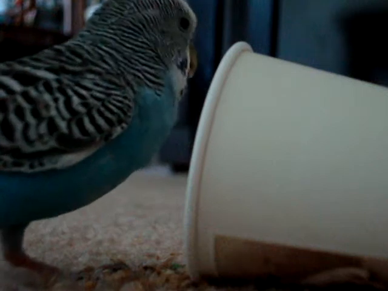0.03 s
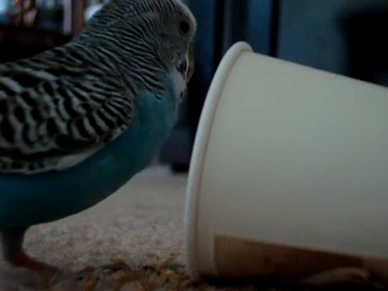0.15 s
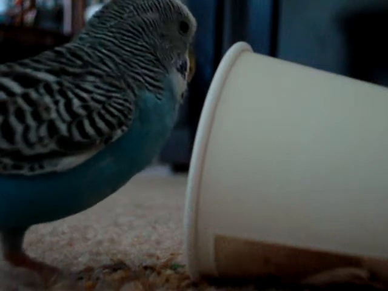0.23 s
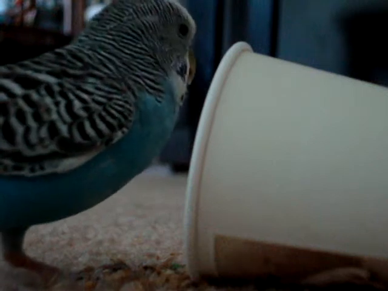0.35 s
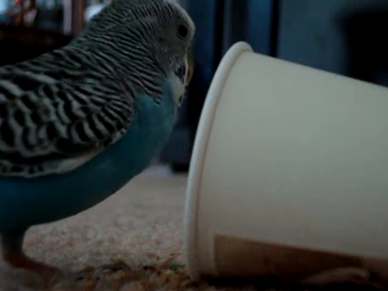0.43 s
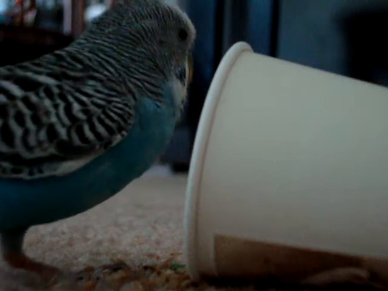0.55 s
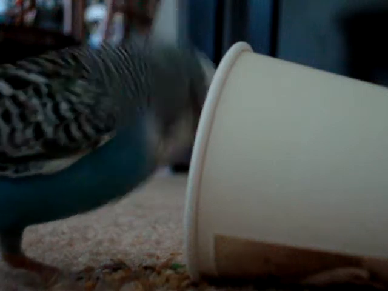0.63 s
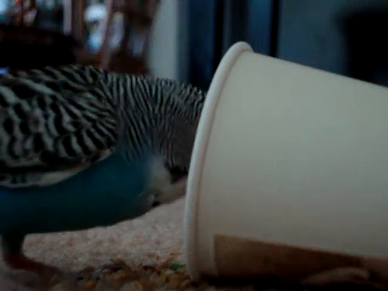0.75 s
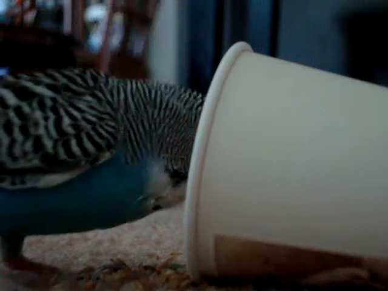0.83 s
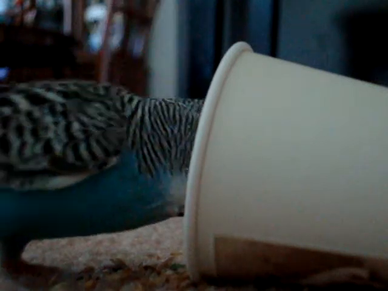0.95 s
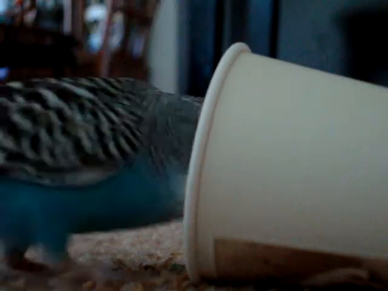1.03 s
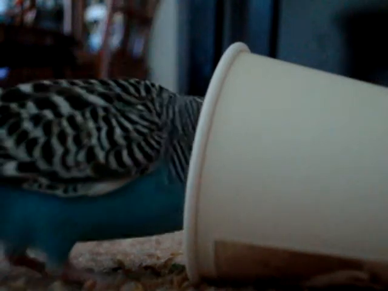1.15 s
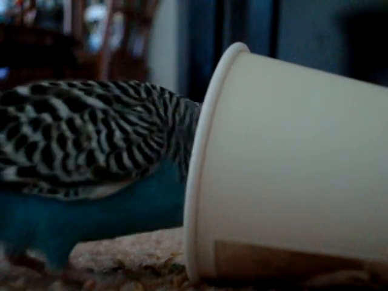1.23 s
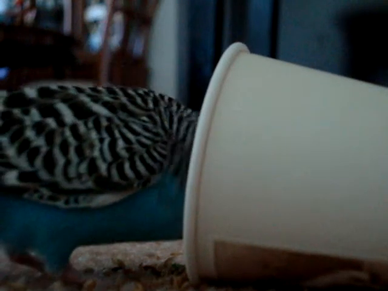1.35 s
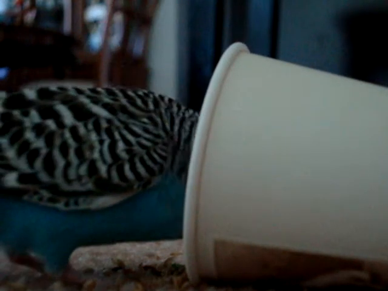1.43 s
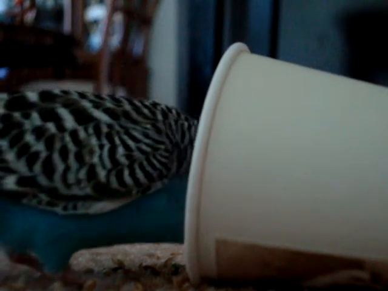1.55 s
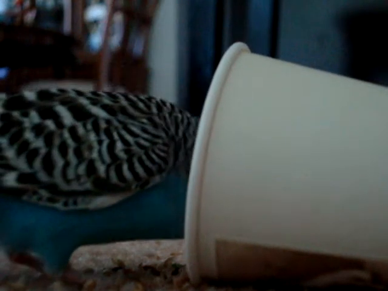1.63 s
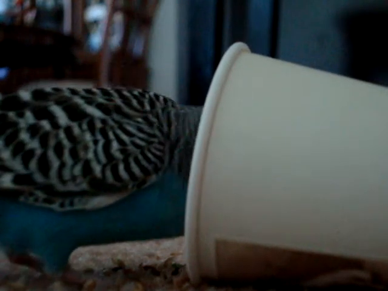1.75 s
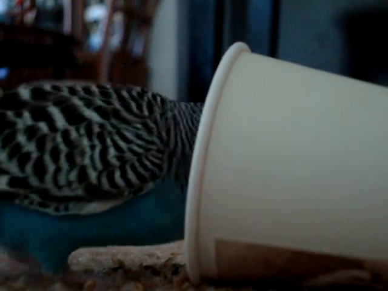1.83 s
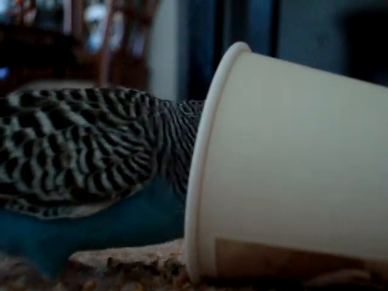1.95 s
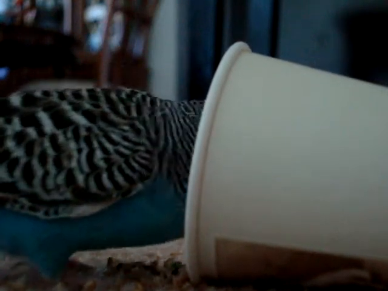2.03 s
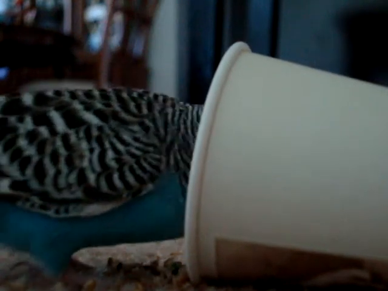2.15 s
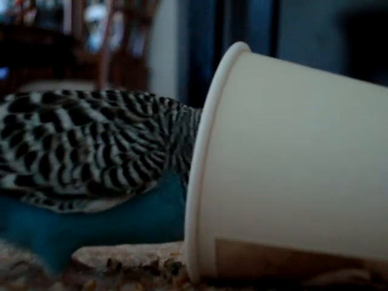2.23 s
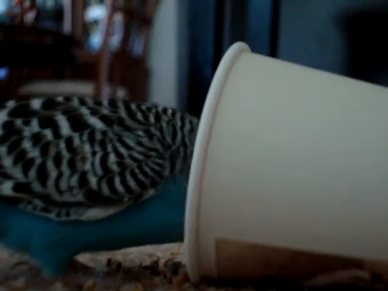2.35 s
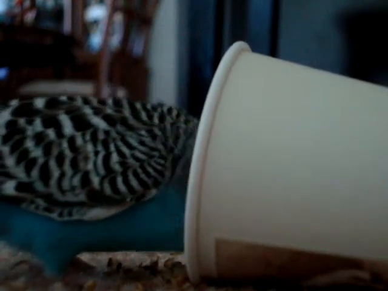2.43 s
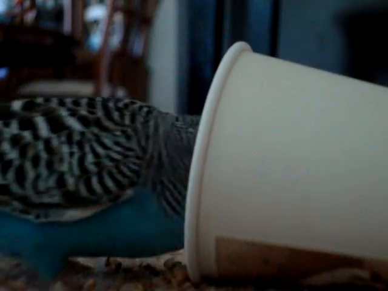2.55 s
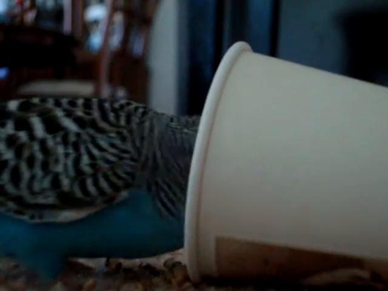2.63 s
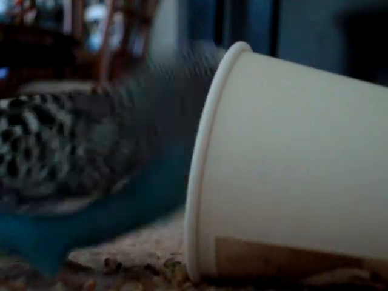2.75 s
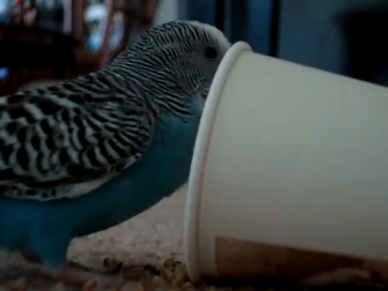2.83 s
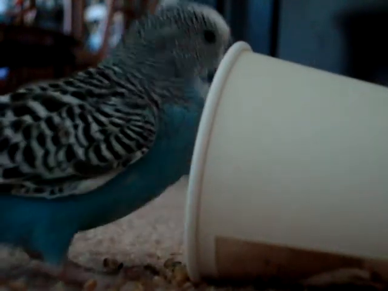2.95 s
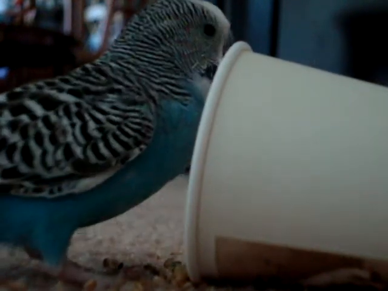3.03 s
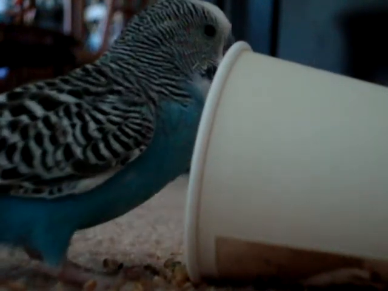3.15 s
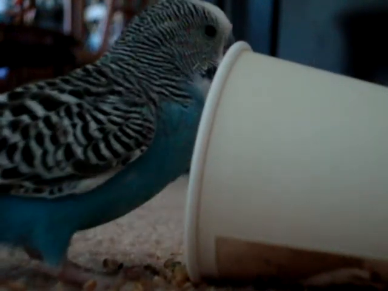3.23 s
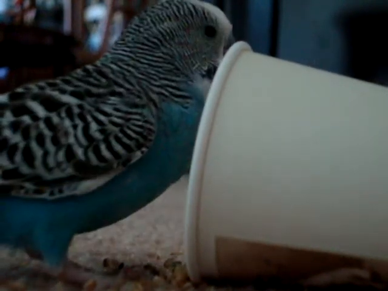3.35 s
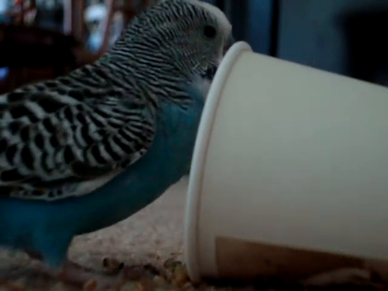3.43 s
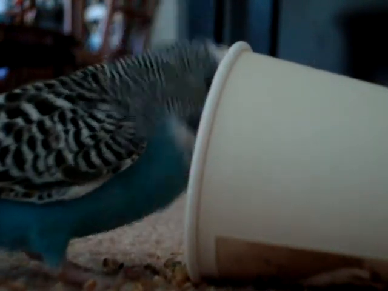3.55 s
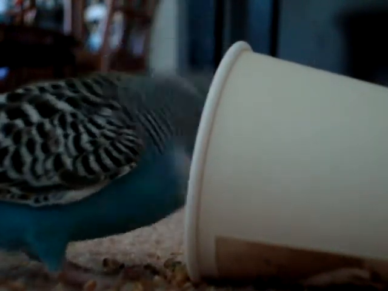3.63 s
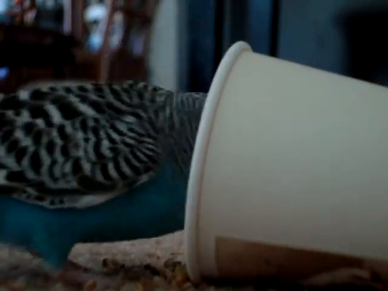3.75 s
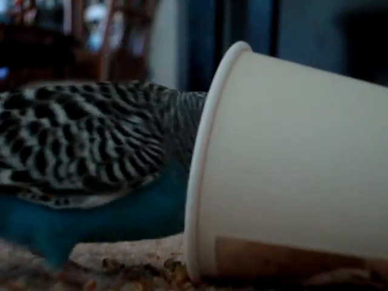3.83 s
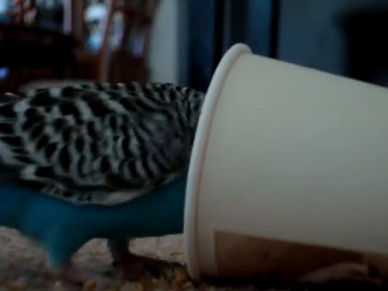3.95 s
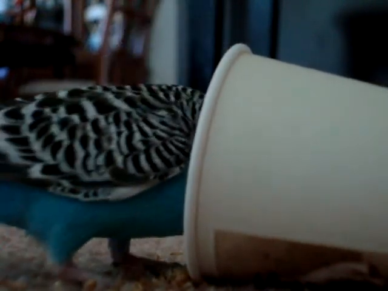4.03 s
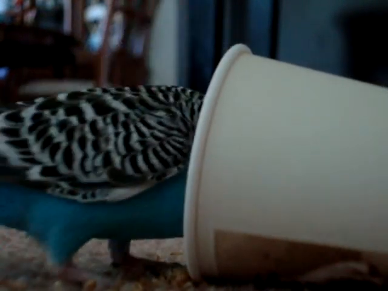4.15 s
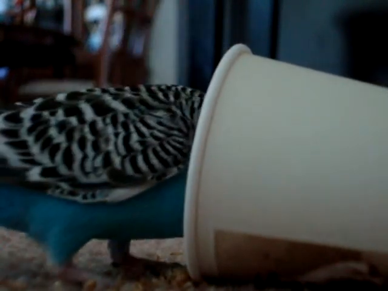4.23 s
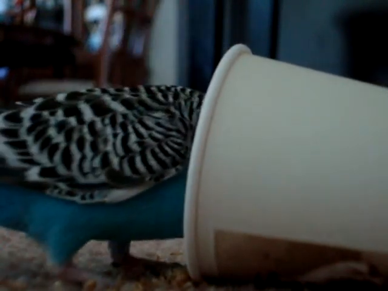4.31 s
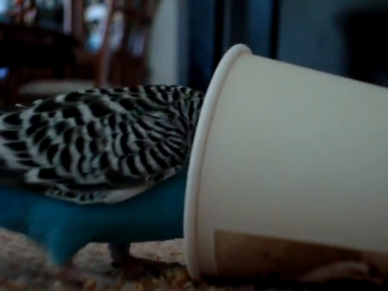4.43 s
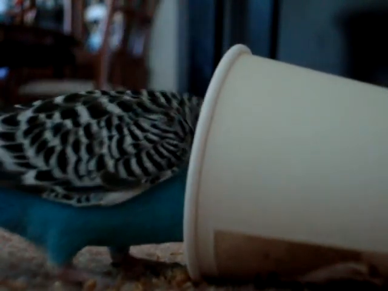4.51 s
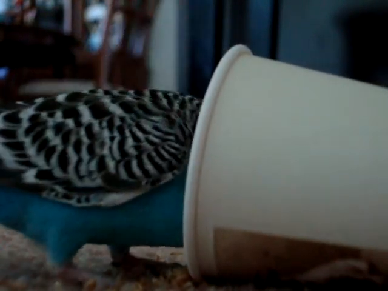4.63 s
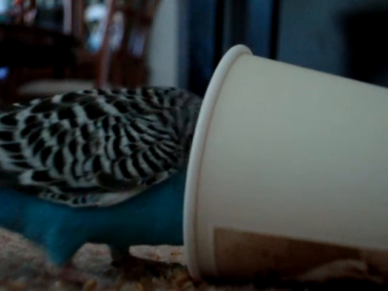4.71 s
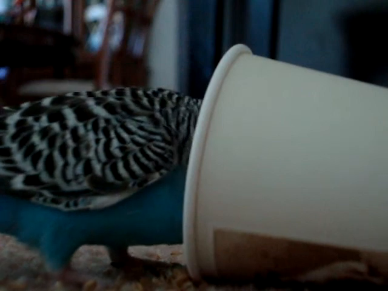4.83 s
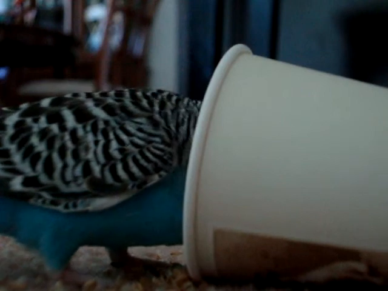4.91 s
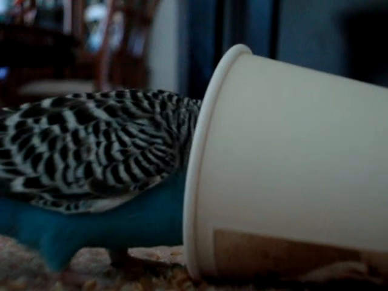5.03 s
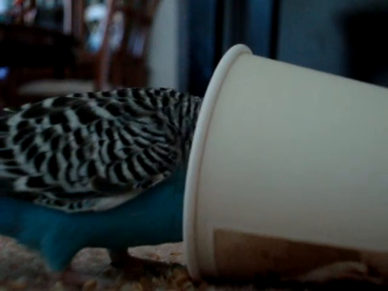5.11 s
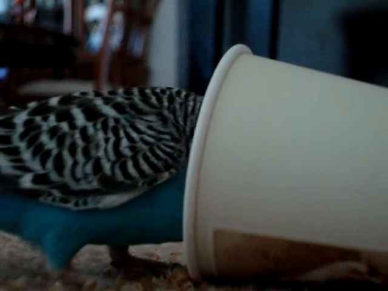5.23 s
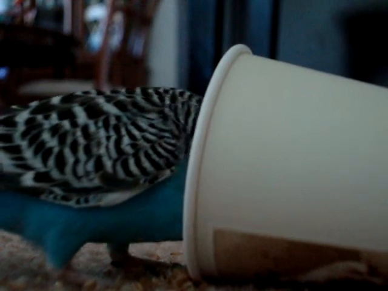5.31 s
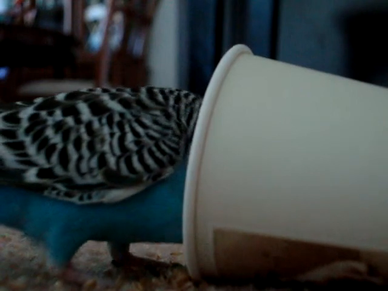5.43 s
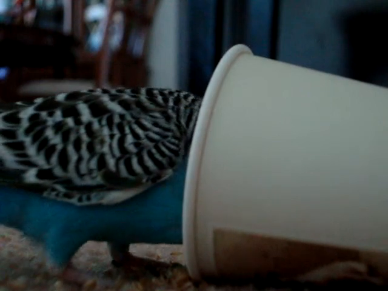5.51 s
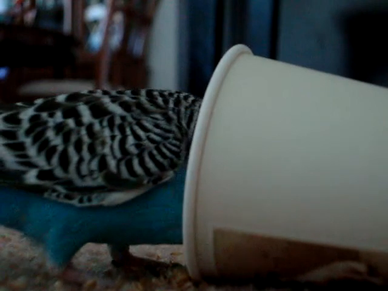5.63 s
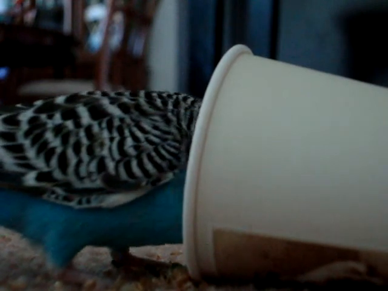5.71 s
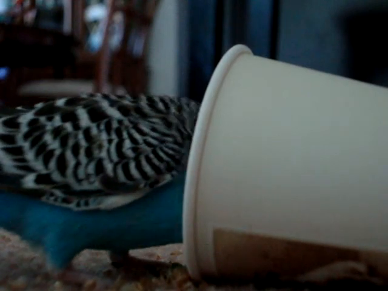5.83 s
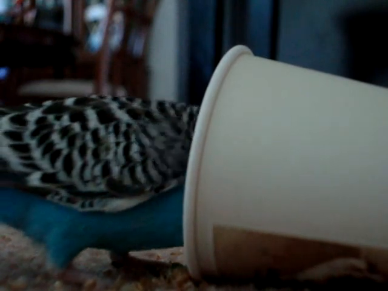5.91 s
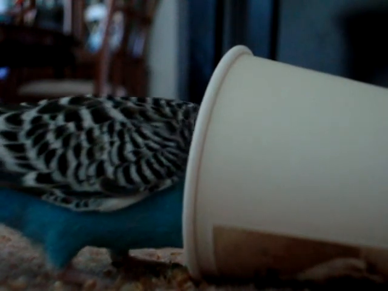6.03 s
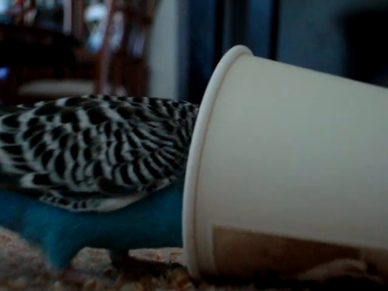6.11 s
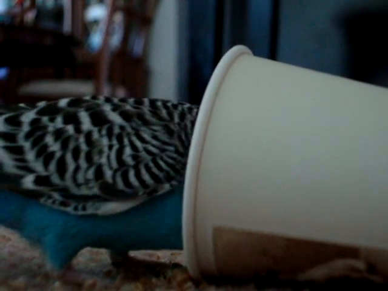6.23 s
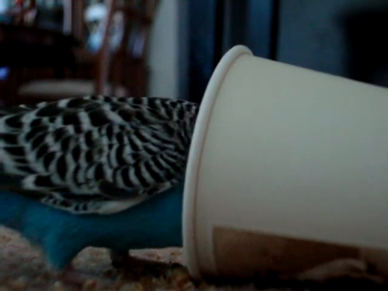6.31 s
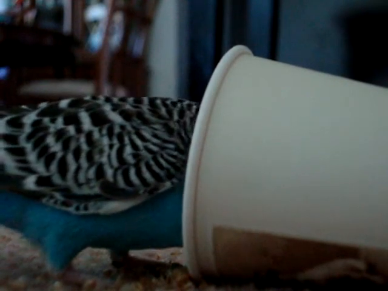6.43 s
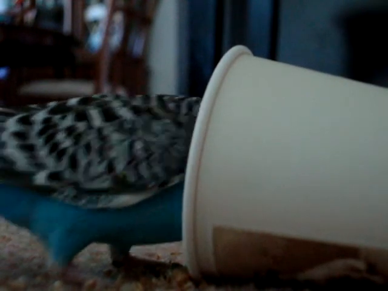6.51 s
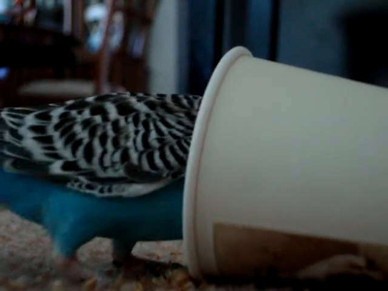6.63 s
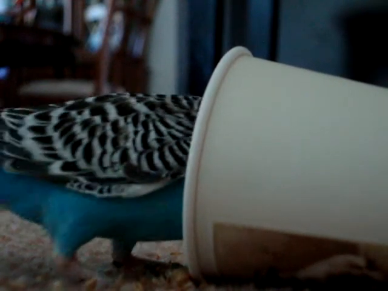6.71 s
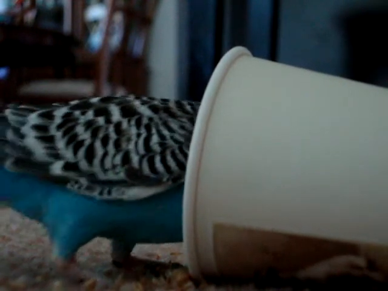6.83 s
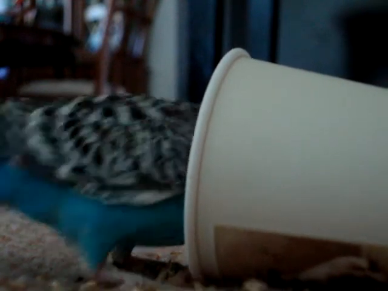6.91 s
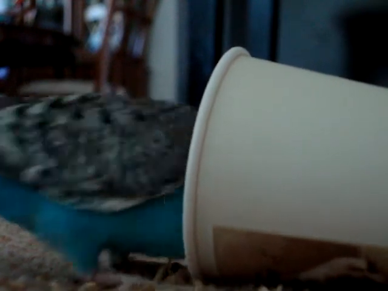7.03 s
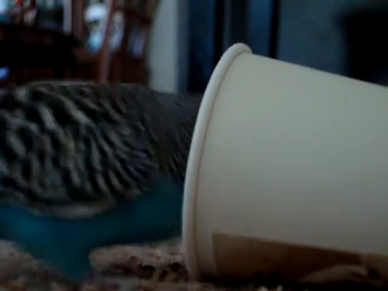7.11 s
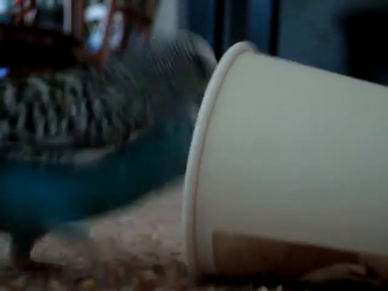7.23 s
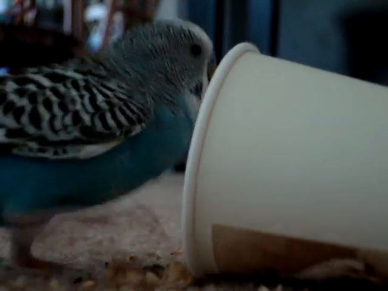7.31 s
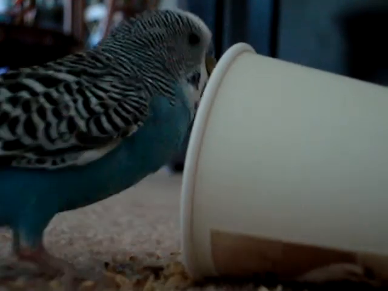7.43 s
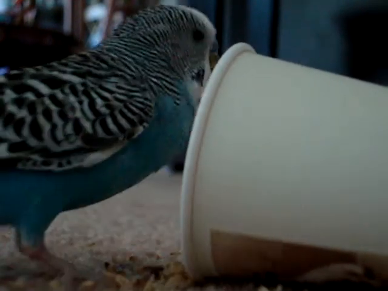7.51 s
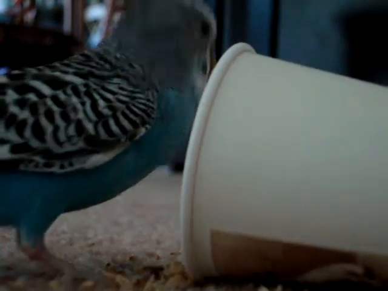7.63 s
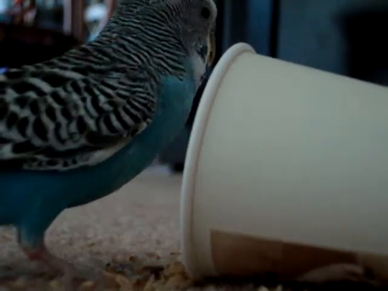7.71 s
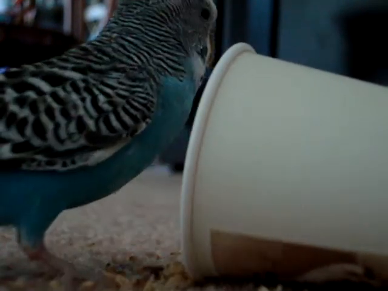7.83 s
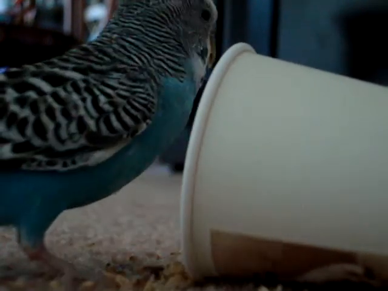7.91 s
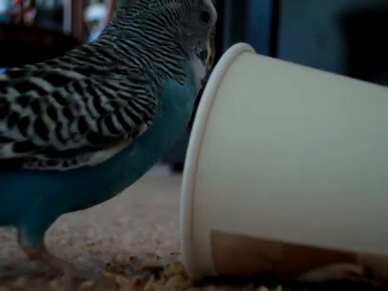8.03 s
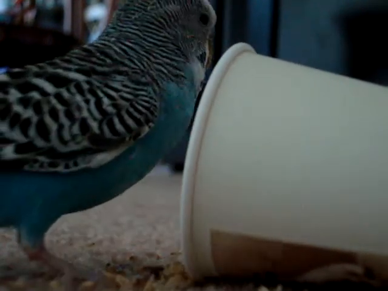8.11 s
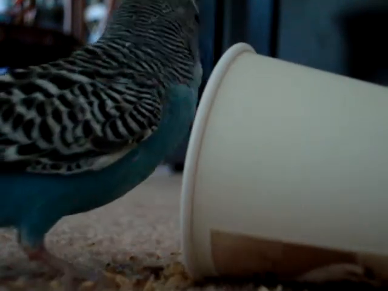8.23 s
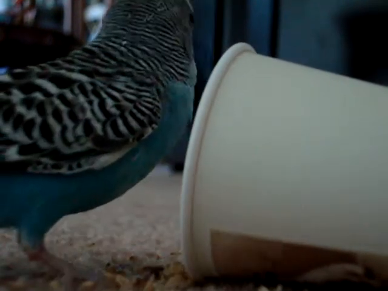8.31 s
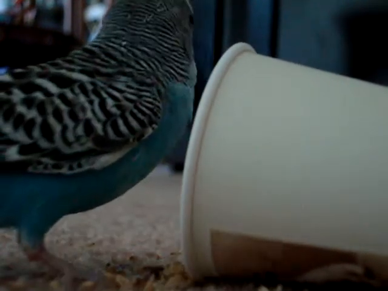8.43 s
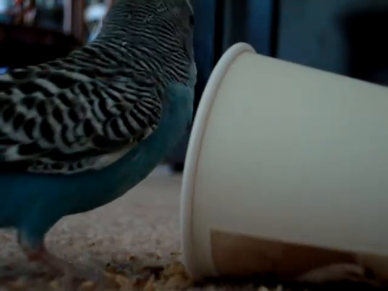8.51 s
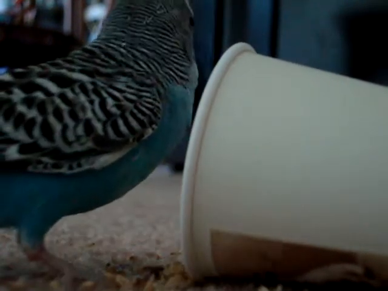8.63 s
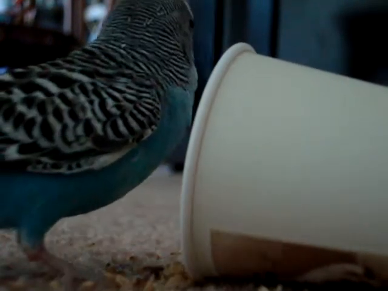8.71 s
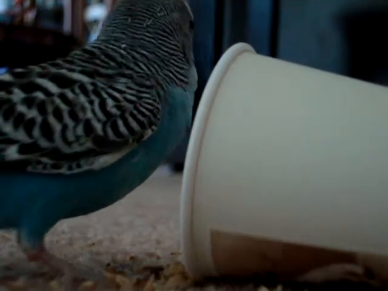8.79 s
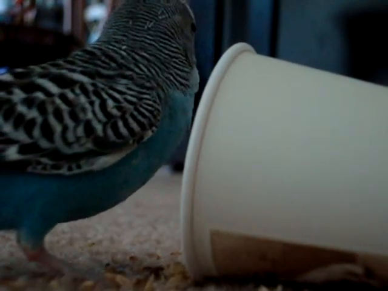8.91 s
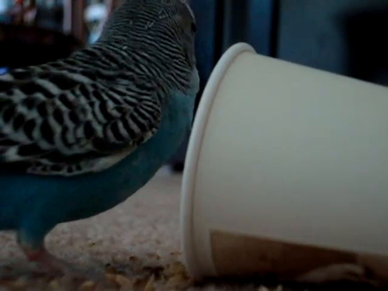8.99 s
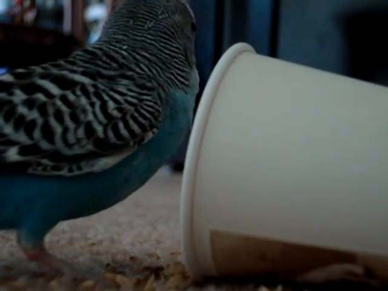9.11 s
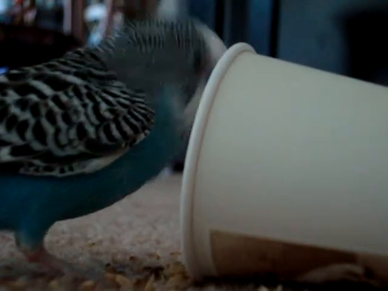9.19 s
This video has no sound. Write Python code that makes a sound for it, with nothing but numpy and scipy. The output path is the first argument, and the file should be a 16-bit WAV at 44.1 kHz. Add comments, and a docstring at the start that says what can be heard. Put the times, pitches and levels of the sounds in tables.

```python
"""Sharp snaps, crunches and papery knocks: a budgie on a carpet cracks seeds and rummages, head first,
in a paper cup lying on its side. Breaking husks and sliding seeds ring the same short, bright modes;
the beak knocks the cup and the floor jolts a microphone lying close by.
Underneath: steady microphone hiss, a wavering hum, two thin high tones and a few faint ticks."""
import sys
import numpy as np
from scipy import signal
from scipy.fft import rfft, irfft
from scipy.io import wavfile

SR = 44100
rng = np.random.default_rng(int(sys.argv[2]) if len(sys.argv) > 2 else 0)


def output_pcm(signal):
    """Save a mono or channel-first signal as 16-bit PCM at the path in sys.argv[1].

    Samples are clipped to [-1, 1] before scaling.
    """
    pcm = np.clip(np.atleast_2d(signal).T, -1, 1) * 32767
    wavfile.write(sys.argv[1], SR, np.round(pcm).astype(np.int16))


N = 408366

# Modes of husk, beak and paper wall. Each row: frequency in Hz, level in dB.
HUSK_MODES = [(2400, -4), (3100, 0), (3800, 0), (4400, -1), (4900, -1), (5300, 0), (5800, 0), (6400, 0),
              (7100, 0), (7900, 0), (8700, -1), (9600, 0)]


def from_db(db):
    """Decibels to gain."""
    return 10 ** (np.asarray(db) / 20)


def unit_rms(x):
    """Scale to unit rms."""
    return x / np.sqrt(np.mean(x ** 2) + 1e-20)


def add(out, start_s, sound):
    """Mix a short sound in at start_s."""
    at = round(start_s * SR)
    out[at:at + len(sound)] += sound[:N - at]


def drift(corner_hz):
    """Slow wander: noise low-passed twice, unit rms."""
    hop, warmup = 40, 2000
    pole = np.exp(-2 * np.pi * corner_hz * hop / SR)
    noise = rng.standard_normal(N // hop + warmup + 2)
    slow = signal.lfilter([1], [1, -2 * pole, pole * pole], noise)[warmup:]
    return np.interp(np.arange(N) / hop, np.arange(len(slow)), unit_rms(slow - slow.mean()))


def ring(force, hz, t60_ms):
    """One mode, heard as surface velocity: a unit click starts it at full height."""
    radius = from_db(-60e3 / (t60_ms * SR))
    angle = 2 * np.pi * hz / SR
    return signal.lfilter([.5, 0, -.5], [1, -2 * radius * np.cos(angle), radius * radius], force)


def husk_ring(force, peaks, t60_ms, scatter, slope_db_oct):
    """Husk modes, strongest near the (Hz, dB) peaks; scatter varies each mode's level and tuning."""
    hz, level_db = np.transpose(HUSK_MODES)
    tilt_db = np.max([db - slope_db_oct * np.abs(np.log2(hz / f)) for f, db in peaks], axis=0)
    gains = from_db(level_db + tilt_db + 1.5 * scatter[0])
    tuned_hz = hz * (1 + .015 * scatter[1])
    modes = sum(gain * ring(force, f, t60_ms) for gain, f in zip(gains, tuned_hz))
    # The piece also rings at the peaks themselves, more so for a steep slope.
    modes += sum(from_db(db) * slope_db_oct / 30 * ring(force, f, t60_ms) for f, db in peaks)
    peaks_hz = [f for f, _ in peaks]
    reach = 2 ** (10 / max(slope_db_oct, 3))  # frequency ratio for a 10 dB fall
    low_hz = max(min(peaks_hz) / reach, 1540)  # bodies this small radiate little bass
    high_hz = min(max(peaks_hz) * reach, .45 * SR)
    return signal.sosfilt(signal.butter(2, (low_hz, high_hz), "band", fs=SR, output="sos"), modes)


def hiss(rms_db=-53):
    """Steady noise of the microphone and its amplifier."""
    # Each row: frequency in Hz, relative density in dB.
    spectrum = [(25, -31.5), (60, -26.5), (95, -18), (140, -16), (250, -10.5), (480, -10.5), (850, -12.5),
                (2000, -17.5), (4700, -22.5), (9300, -26.5)]
    corner_hz, corner_db = np.transpose(spectrum)
    hz = np.maximum(np.arange(N // 2 + 1) * SR / N, 1)
    shape_db = np.interp(np.log(hz), np.log(corner_hz), corner_db)
    noise = irfft(rfft(rng.standard_normal(N)) * from_db(shape_db), N)
    return from_db(rms_db) * unit_rms(noise)


def hum_and_whine(hum_hz=239.4, hum_rms_db=-62.5, waver_hz=1.12, waver_db=.6):
    """A low hum wavering in pitch and level, plus two steady high tones."""
    # Each row: frequency in Hz, rms level in dB.
    whine_tones = [(7552, -80), (7582, -84)]
    t_s = np.arange(N) / SR
    cycles = np.cumsum(hum_hz + waver_hz * drift(3.3)) / SR
    hum = from_db(hum_rms_db + waver_db * drift(4.0)) * np.sin(2 * np.pi * cycles)
    whine = sum(from_db(db) * np.sin(2 * np.pi * hz * t_s) for hz, db in whine_tones)
    return np.sqrt(2) * (hum + whine)


def faint_ticks():
    """Clicks into one small mode, barely above the hiss."""
    # Each row: start in seconds, peak in dB.
    ticks = [(7.6835, -46), (9.0515, -50), (9.068, -49), (9.135, -48), (9.1515, -48)]
    force = np.full(N, 1e-18)
    for start_s, peak_db in ticks:
        force[round(start_s * SR)] = from_db(peak_db)
    return ring(force, hz=4800, t60_ms=12)


def floor_jolts():
    """Jolts through the floor push the microphone's membrane: it dips, jumps out and settles."""
    # Each row: start in seconds, level in dB, settling time constant in ms.
    jolts = [(3.0831, -28.5, 0.79), (6.9172, -32, 1.2), (6.9309, -25, 0.57)]
    out = np.zeros(N)
    t_ms = np.arange(1024) * 1000 / SR
    for start_s, level_db, settle_ms in jolts:
        pulse = np.exp(-t_ms / settle_ms) - 3.15 * np.exp(-t_ms / .055)
        add(out, start_s, from_db(level_db) * pulse)
    return out


def cup_knocks(rebound_s=.0052, peck_rim_db=-13, tap_low_db=-12, tap_rim_db=3.5, trim_db=-4.5):
    """Pecks, rebounds on the rim and light taps each push the paper in and ring the cup's modes."""
    # Cup modes. Each row: frequency in Hz, level in dB, T60 in ms.
    thump_modes = [(139, -2, 12)]  # whole cup shoved
    air_modes = [(415, 7, 9.1)]
    base_modes = [(850, 0, 20)]
    wall_modes = [(1138, -2.5, 31), (1270, -0.14, 33)]
    rim_modes = [(1557, 1.5, 16.3), (1782, -1.5, 29), (2510, -4, 20)]
    # Beak driving into the cup. Each row: start in seconds, level in dB, drive of thump, air
    # and base in dB re the wall, rebound in dB re the peck.
    pecks = [(2.419, -35.5, -12, 6, 8.5, -2.5), (4.582, -32, 0, 2.5, -2, -1),
             (5.4093, -27, -2, -5, -23, -7), (5.996, -31.5, -1.5, -3, -10, 0.5),
             (6.9169, -16.5, -22, -27, -14.5, -10.5)]
    # Light taps near the rim. Each row: start in seconds, level in dB.
    taps = [(1.0586, -44.5), (1.5118, -35.5), (3.6554, -43.5), (3.9484, -40), (3.993, -48), (6.894, -40),
            (6.9, -44), (6.9102, -32), (6.965, -42.5), (6.986, -46), (6.9926, -44), (7.2757, -41.5)]
    rebounds = [(s + rebound_s, db + rebound_db) for s, db, *_, rebound_db in pecks]
    hits = [(s, db, *low_db, peck_rim_db) for s, db, *low_db, _ in pecks]
    hits += [(s, db, tap_low_db, tap_low_db, tap_low_db, tap_rim_db) for s, db in rebounds + taps]
    start_s, hit_db, thump_db, air_db, base_db, rim_db = np.transpose(hits)
    at = np.round(start_s * SR).astype(int)
    out = np.zeros(N)
    for modes, drive_db in ((thump_modes, thump_db), (air_modes, air_db), (base_modes, base_db),
                            (wall_modes, 0), (rim_modes, rim_db)):
        for hz, mode_db, t60_ms in modes:
            scatter_db = rng.normal(0, 1.0, len(at))
            force = np.full(N, 1e-18)
            force[at] = -from_db(hit_db + drive_db + mode_db + trim_db + scatter_db)
            out += ring(force, hz, t60_ms)
    return signal.sosfilt(signal.butter(2, (140, 2160), "band", fs=SR, output="sos"), out)


def seed_crunch(grains_per_s=8000, dense_ms=24, t60_ms=5.5, creak_ms=4, crumble_ms=6):
    """Seeds grind and slide: swells of uneven grains drive the husk modes."""
    # Each row: crest time in seconds, rms at the crest in dB, length in ms, brightest frequency
    # in Hz, slope away from it in dB per octave.
    swells = [(1.059, -37, 4.5, 5200, 10), (1.079, -48, 5, 4900, 40), (1.514, -40.5, 11, 4800, 9),
              (1.535, -51, 20, 5200, 34), (1.63, -59, 115, 8650, 23.5), (2.423, -31.5, 18, 5900, 9),
              (2.458, -49, 41, 5500, 12), (2.64, -54.5, 66, 8350, 27), (4.588, -30.5, 12.6, 5300, 8),
              (4.599, -51, 9.1, 5000, 12), (4.62, -52, 11, 5500, 24), (5.4148, -32.5, 7, 5600, 6),
              (5.428, -51, 12, 5800, 14), (5.917, -45, 19, 4630, 9), (6.003, -30, 7.9, 5400, 5),
              (6.011, -52, 7.9, 5500, 8), (6.037, -48, 4, 5300, 36), (6.9097, -31, 3.5, 5900, 28),
              (6.919, -23, 6, 5400, 14), (6.925, -21.5, 7.9, 4200, 10), (6.951, -42, 47, 4900, 10),
              (6.992, -39, 26, 4800, 9), (7.015, -50, 50, 4800, 11), (7.282, -34.5, 6.4, 5140, 12),
              (7.292, -34.5, 8.7, 4900, 12)]
    out = np.zeros(N)
    t_ms = np.arange(5120) * 1000 / SR
    draws = rng.random((len(swells), 3, len(t_ms)))
    scatters = rng.standard_normal((len(swells), 2, len(HUSK_MODES)))
    for swell, (chance, size, sign), scatter in zip(swells, draws, scatters):
        crest_s, rms_db, length_ms, bright_hz, slope_db_oct = swell
        rate_per_s = grains_per_s * min(1, dense_ms / length_ms)  # long slides are sparser
        size_db = -3.8 * np.log(size + .01)
        grains = (chance < rate_per_s / SR) * from_db(size_db) * np.sign(sign - .5)
        rise_ms = .45 * length_ms
        corners_ms = np.cumsum([0, creak_ms, rise_ms, length_ms - rise_ms, crumble_ms])
        envelope = from_db(np.interp(t_ms, corners_ms, [-25, -9, 0, -9, -25], right=-200))
        peaks = [(bright_hz, 0)]
        steady_rms = np.std(husk_ring(grains, peaks, t60_ms, scatter, slope_db_oct))
        sound = husk_ring(grains * envelope, peaks, t60_ms, scatter, slope_db_oct) / steady_rms
        add(out, crest_s - corners_ms[2] / 1000, from_db(rms_db) * sound)
    return out


def husk_snaps(splinter_gain=.1):
    """Husks snap, seeds tick on paper: one click starts all modes, faint splintering follows."""
    # Each row: start in seconds, peak in dB, brightest frequency in Hz, slope away from it in dB
    # per octave, second ring in Hz, its level in dB re the first.
    snaps = [(0.2148, -30, 6500, 26, 3400, -2), (0.4997, -29.5, 9300, 35, 6700, -7),
             (0.9764, -41, 4300, 18, 6000, -10), (1.0566, -22, 3350, 22, 5300, -4),
             (1.0574, -23.5, 5300, 36, 3300, -3), (1.0592, -25.5, 5400, 30, 2500, -4),
             (1.0702, -27.5, 4960, 26, 2720, 5), (1.512, -24.5, 4750, 35, 7600, -8),
             (2.4125, -36, 6000, 14, 9000, -6), (2.4153, -25, 5500, 10, 8000, -4),
             (2.4188, -21, 5600, 12, 8500, -4), (2.4243, -21, 5400, 19, 3000, -2),
             (2.4443, -31, 6200, 12, 4000, -5), (2.458, -33, 4200, 18, 6500, -8),
             (2.4694, -32, 6200, 10, 4000, -5), (2.645, -36.5, 8000, 12, 5500, -6),
             (2.7083, -28, 5850, 26, 4180, -1), (2.918, -40, 7200, 16, 9000, -3),
             (3.1785, -38, 6800, 16, 9000, -4), (3.2974, -35.5, 7200, 24, 9000, -3),
             (3.6527, -31, 7800, 26, 5000, -12), (3.6549, -17, 7530, 24, 5500, -9),
             (3.7253, -21.5, 6100, 17, 4000, -3), (3.9484, -19, 6600, 15, 9000, 1),
             (3.9935, -19.5, 8700, 7, 3000, 1), (4.0356, -40, 5700, 18, 8000, -8),
             (4.582, -21, 7000, 18, 4100, -4), (4.588, -24.5, 4100, 30, 5300, -6),
             (4.6047, -41, 6300, 12, 4500, -4), (4.6258, -36, 4700, 24, 6500, -8),
             (4.667, -37.5, 7500, 14, 5500, -5), (4.718, -33.5, 7200, 32, 6100, -1),
             (4.928, -38, 6230, 36, 7500, -5), (5.4083, -22.5, 7000, 16, 4900, -2),
             (5.4152, -24, 6300, 14, 3200, 5), (5.418, -27, 5800, 18, 7500, -3),
             (5.453, -36, 6500, 14, 9000, -7), (5.992, -39, 4200, 22, 6000, -10),
             (5.996, -25, 4200, 22, 5300, -3), (5.9997, -21, 4700, 30, 6500, -3),
             (6.0023, -20, 6350, 20, 4730, 4), (6.0077, -28, 4700, 20, 8200, -4),
             (6.0358, -35, 5300, 40, 3400, -2), (6.242, -36.5, 6500, 30, 8200, -1),
             (6.9093, -16, 6700, 30, 4400, -5), (6.9167, -13, 5500, 22, 3400, -3),
             (6.9202, -15, 5300, 16, 7000, -1), (6.9222, -14.5, 4900, 20, 2900, -2),
             (6.9293, -9.5, 5300, 16, 3000, -6), (6.9385, -34, 5500, 10, 8500, -3),
             (6.986, -28, 4900, 18, 3000, -5), (7.158, -34, 6500, 16, 8500, -4),
             (7.1716, -35, 6600, 14, 8500, -4), (7.28, -25, 5200, 23, 6700, -7),
             (7.287, -19.5, 4770, 28, 3300, -7), (7.5022, -38, 7000, 12, 8500, -2),
             (8.015, -31.5, 6250, 18, 4300, -10), (8.5264, -36, 6800, 14, 5000, -6)]
    out = np.zeros(N)
    t_ms = np.arange(1024) * 1000 / SR
    scatters = rng.standard_normal((len(snaps), 2, len(HUSK_MODES)))
    splinters = rng.standard_normal((len(snaps), len(t_ms)))
    for snap, scatter, noise in zip(snaps, scatters, splinters):
        start_s, peak_db, bright_hz, slope_db_oct, second_hz, second_db = snap
        splinter_t60_ms = max(5 + 2 * np.log2(bright_hz / 4020), 1)  # bright, dry husks splinter longer
        force = splinter_gain * noise * from_db(-60 * t_ms / splinter_t60_ms)
        force[0] = -1  # the break
        ring_t60_ms = 3.8 + .07 * slope_db_oct  # a narrower snap rings longer
        peaks = [(bright_hz, 0), (second_hz, second_db)]
        sound = husk_ring(force, peaks, ring_t60_ms, scatter, slope_db_oct)
        add(out, start_s, from_db(peak_db) * sound / np.abs(sound).max())
    return out


def scene():
    """Bird, cup and background at one microphone."""
    bird = husk_snaps() + seed_crunch() + cup_knocks() + floor_jolts()
    background = faint_ticks() + hiss() + hum_and_whine()
    return (bird + background)[None]


def record(dry, mic_top_hz=9980, cutoff_hz=10944):
    """Narrow-band recorder: two steep low-passes end the treble near 10 kHz."""
    narrow = signal.sosfilt(signal.ellip(8, .5, 42, mic_top_hz, fs=SR, output="sos"), dry)
    return signal.sosfilt(signal.ellip(6, .5, 40, cutoff_hz, fs=SR, output="sos"), narrow)


dry = scene()
out = record(dry)
output_pcm(out)
```